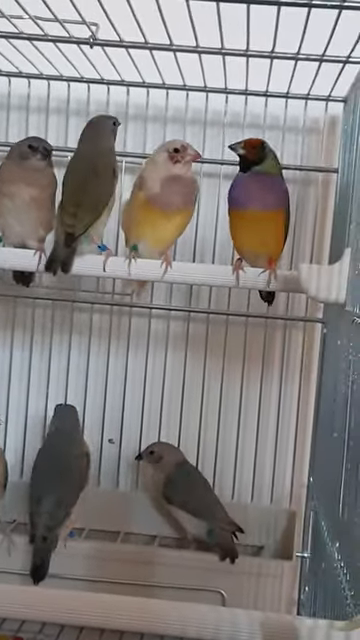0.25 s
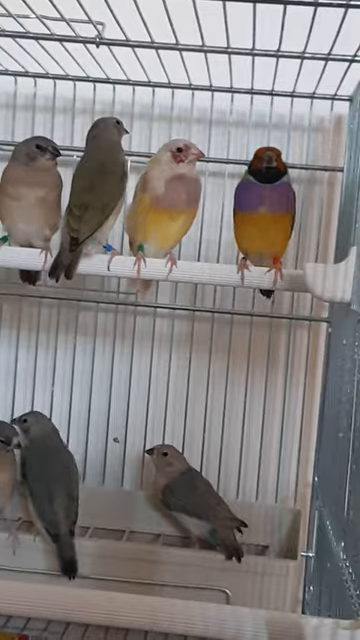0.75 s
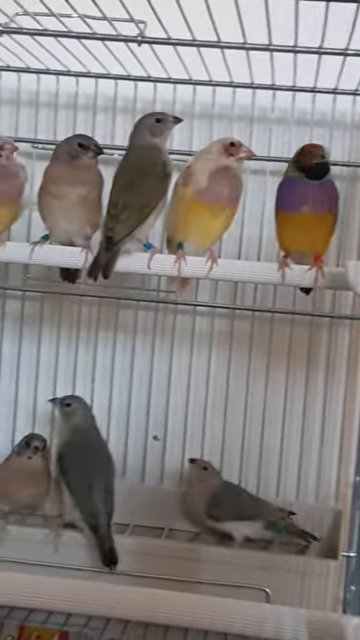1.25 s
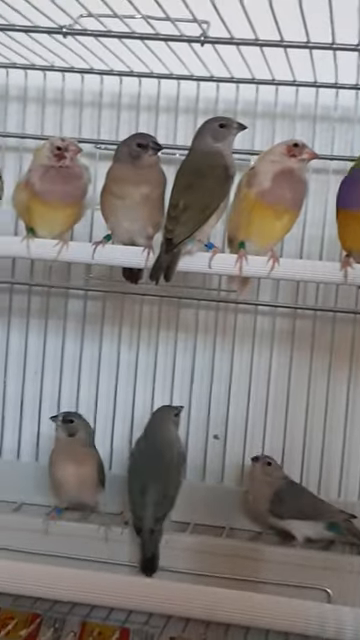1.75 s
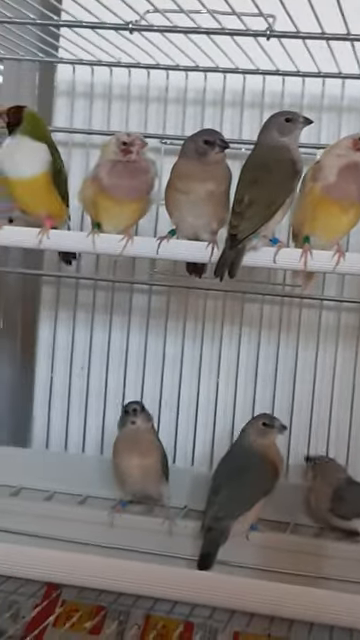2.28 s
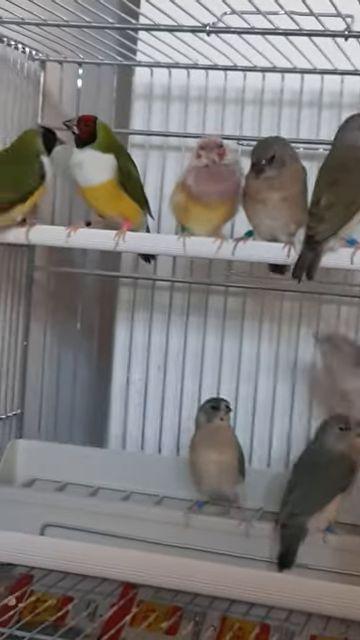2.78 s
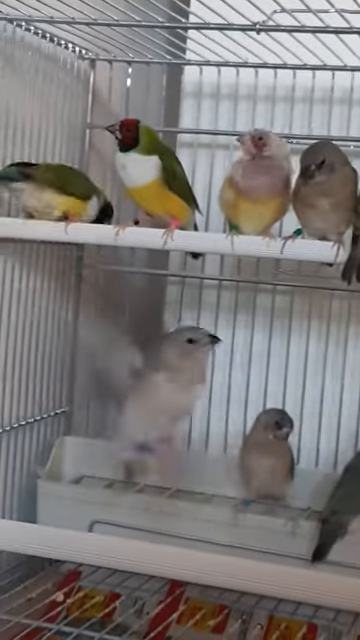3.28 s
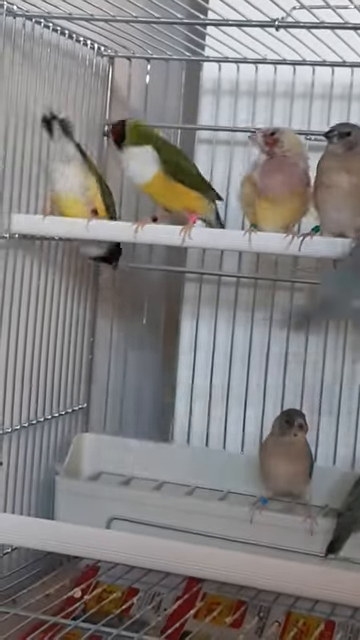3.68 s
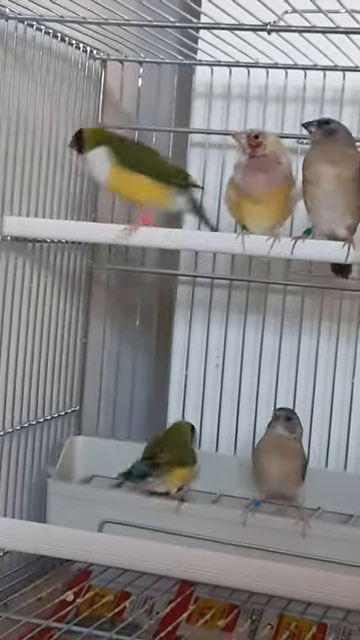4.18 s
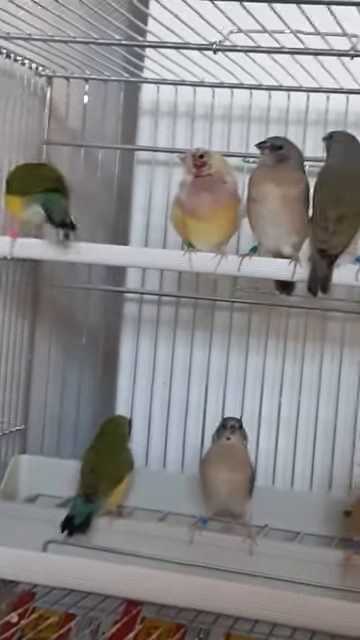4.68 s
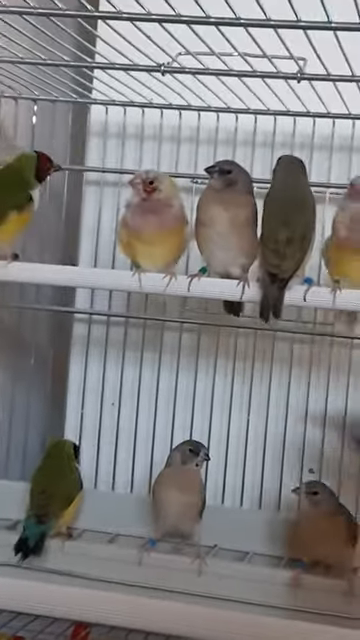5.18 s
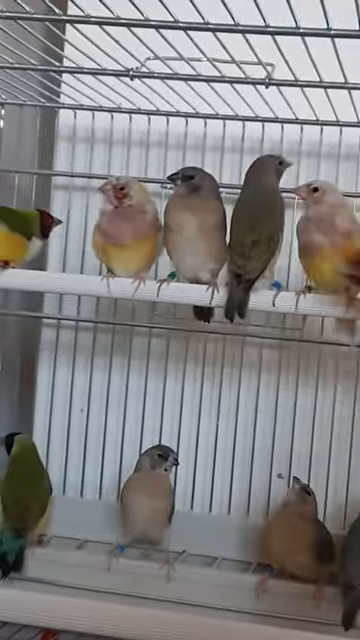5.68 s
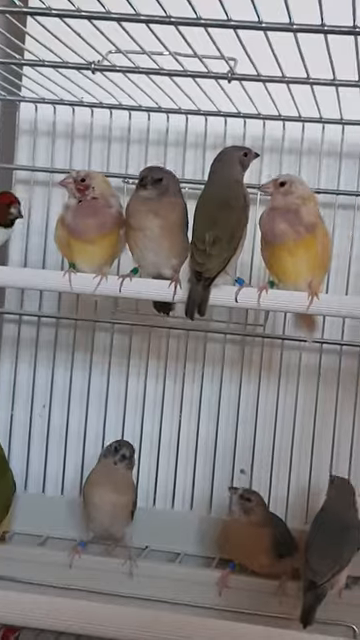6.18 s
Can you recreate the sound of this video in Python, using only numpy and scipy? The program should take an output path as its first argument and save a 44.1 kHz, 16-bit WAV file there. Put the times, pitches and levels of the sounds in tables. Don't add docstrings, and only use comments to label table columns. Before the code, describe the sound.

Close inside a quiet room, caged finches start with soft low wing puffs and faint far calls. A long thin whistle wavers near one second, then a male repeats rising whistles, rough churrs and sharp falling chirps. From about three seconds wings flap hard, buffeting the microphone, with claws ticking on wire and a loud perch knock at four. Loud high calls follow, then it thins to a last flutter.

```python
import sys
import numpy as np
from scipy import signal
from scipy.fft import rfft, irfft, next_fast_len
from scipy.io import wavfile
from scipy.ndimage import uniform_filter1d, map_coordinates

SR = 44100
rng = np.random.default_rng(int(sys.argv[2]) if len(sys.argv) > 2 else 0)


def dump(signal):
    limited = np.clip(np.atleast_2d(signal).T, -1, 1)
    pcm = np.round(limited * 32767).astype(np.int16)
    wavfile.write(sys.argv[1], SR, pcm)


def boost_factor(decibels):
    exponent = np.asarray(decibels, float) / 20
    return 10 ** exponent


N = 284004
TIME = np.arange(N) / SR


def unit(x):
    return x / np.sqrt(np.mean(np.abs(x) ** 2) + 1e-20)


def along(points, hz):
    f, v = np.transpose(points)
    return np.interp(np.log(hz + 1), np.log(f + 1), v)


def wobble(rate, size=N):
    place = np.arange(size) * abs(rate) / SR
    points = rng.standard_normal(int(size * abs(rate) / SR) + 4)
    return map_coordinates(points, [place], order=1)


def rush(spectrum, excite):
    # pitch in Hz, likeness from 0 to 1.
    alike = [(60, .68), (290, .62), (640, .34), (1400, .08), (6000, .02)]
    m = next_fast_len(N + 8192)
    hz = np.fft.rfftfreq(m, 1 / SR)
    spread = np.arccos(np.clip(along(alike, hz), -1, 1)) / 2
    noise = rfft(excite * rng.standard_normal((2, N)), m)
    pair = noise * boost_factor(along(spectrum, hz)) * [np.cos(spread), np.sin(spread)]
    mid, side = irfft(pair, m)[:, :N]
    return unit(np.array([mid + side, mid - side]))


def add(out, start_s, sound, pan_db, room_db, lag=4, size=140):
    # pitch in Hz, time to fall by 60 dB in seconds.
    room = [(500, 0.12), (3500, 0.56), (6000, 0.36), (12000, 0.41)]
    hz, t = np.fft.rfftfreq(256, 1 / SR), np.arange(size) * 128 / SR
    z = rng.standard_normal((2, len(hz), 2 * len(t))).view(complex)
    fade = boost_factor(-60 * t / along(room, hz)[:, None])
    tail = signal.istft(z * fade, SR, nperseg=256)[1]
    tail = boost_factor(room_db) * tail / np.linalg.norm(tail[0])
    answer = np.pad(tail, ((0, 0), (330, 0)))
    answer[0, 0] += boost_factor(pan_db / 2)
    answer[1, lag] += boost_factor(-pan_db / 2)
    for ch in (0, 1):
        answer[ch, rng.integers(20, 330, size=3)] += boost_factor(-16) * rng.standard_normal(3)
    heard = signal.fftconvolve(sound[None], answer, axes=1)
    part = out[:, max(round(start_s * SR), 0):][:, :heard.shape[1]]
    part += heard[:, :part.shape[1]]


def whistle(rows, hoarse, width_hz, overtone_db):
    s, hz, db = np.transpose(sorted(map(tuple, rows)))
    t = np.arange(s[0], s[-1], 1 / SR)
    pitch = np.interp(t, s, hz) * (1 + 0.002 * wobble(150, size=len(t)))
    phase = 2 * np.pi * np.cumsum(pitch) / SR
    overtones = [(1, 0), (2, overtone_db),
                 (3, min(1.4 * overtone_db - 8.0, -11)), (4, min(overtone_db + 2.0, -19))]
    tone = np.zeros(len(t), complex)
    for k, level_db in overtones:
        if k * min(hz) >= SR / 3:
            continue
        noisy = np.clip(hoarse * k, 0, 1)
        rate = 2 * np.sqrt(k) * width_hz
        breath = wobble(rate, size=len(t)) + 1j * wobble(rate, size=len(t))
        shake = np.sqrt(1 - noisy) + np.sqrt(noisy) * breath
        tone += boost_factor(level_db) * shake * np.exp(1j * k * phase)
    edge = np.clip(np.minimum(t - s[0], s[-1] - t) / 0.0014, 0, 1)
    return np.sqrt(2) * boost_factor(np.interp(t, s, db)) * edge * tone.real


def rising_whistles(out):
    # time from the accent in seconds, pitch in Hz, level in dB.
    rise = [(-.075, 3350, -40), (-.06, 3450, -22), (-.03, 3620, -19), (-.011, 3780, -15), (-.005, 4000, -6),
            (0, 4330, -1), (.004, 4560, 0), (.0075, 4700, -5), (.009, 4720, -30)]
    # time from the accent in seconds, pitch in Hz, level in dB.
    under = [(-.085, 1756, -52.5), (-.06, 1827, -9), (-.03, 1900, -5.5), (-.008, 2050, -8.5),
             (.002, 2010, -12)]
    # accent in seconds, level in dB, lead-in in dB, second voice in dB,
    # left-right balance in dB.
    rises = [
        (2.274, -42, 1, -15, 9),
        (2.44, -38.5, -6, -16.5, 8.5),
        (2.589, -38, -6.5, -16.5, 6),
        (3.508, -52, -5, -5.5, 5),
        (3.666, -44, 4, -12, 1.5),
        (3.859, -36.5, -7, -18, 9),
        (4.569, -33.5, -20.5, -19.5, 5.5),
        (4.716, -28, 8.5, -26, 4.5),
    ]
    for s, db, lead_db, under_db, pan_db in rises:
        rows = [(t, hz, level + lead_db * (hz < 4000)) for t, hz, level in rise]
        add(out, s + rise[0][0], boost_factor(db) * whistle(rows, .14, 300, -36), pan_db, -4)
        second = whistle(under, 1.0, 250.4, 0.89)
        add(out, s + under[0][0], boost_factor(db + under_db) * second, -2.5, -3)


def falling_chirps(out):
    # time from the accent in seconds, pitch in Hz, level in dB.
    fall = [(-.001, 4600, -25), (.001, 4620, -2), (.006, 4580, 0), (.0072, 4200, -16), (.0085, 3550, -8),
            (.024, 2950, -6), (.031, 2620, -23), (.044, 1860, -14), (.054, 1750, -24)]
    # accent in seconds, level in dB, glide in dB, left-right balance in dB.
    falls = [
        (2.933, -31, -4.5, 2),
        (4.19, -28.5, -5.5, 0),
        (5.238, -36, 4.5, 2.5),
    ]
    accent, glide = fall[:4], fall[3:]
    for s, db, glide_db, pan_db in falls:
        add(out, s + accent[0][0], boost_factor(db) * whistle(accent, 0.14, 400, -42), pan_db, -7)
        glide_sound = boost_factor(db + glide_db) * whistle(glide, 0.2, 300, -16)
        add(out, s + glide[0][0], glide_sound, pan_db + 10, -7)


def throat_buzzes(out):
    # start and end in seconds, first and last pitch in Hz, level in dB.
    buzzes = [
        (2.979, 3.026, 371.6, 389.8, -46),
        (4.237, 4.286, 377.7, 377, -45.5),
        (5.281, 5.338, 386, 380.3, -45.5),
    ]
    # pitch in Hz, level in dB.
    throat = [(400, -85), (750, -4.5), (1200, -3.5), (2000, -1.5), (2600, 7), (3200, 0), (4500, -6.5),
              (6000, -77)]
    # start and end in seconds, first and last pitch in Hz, level in dB.
    churrs = [
        (2.696, 2.764, 345, 415, -54),
        (3.954, 4.03, 350, 413, -54),
    ]
    # pitch in Hz, level in dB.
    churr_throat = [(400, -60), (800, -5), (1500, -7), (2050, 4), (2500, -5), (3800, -9), (4520, 3),
                    (5300, -40)]
    # start and end in seconds, first and last pitch in Hz, level in dB.
    grumbles = [
        (4.811, 4.959, 209.6, 237.5, -51),
    ]
    # pitch in Hz, level in dB.
    grumble_throat = [(700, -46), (1100, -4), (1500, 0), (1900, -3.5), (2600, -11.5), (3200, -4),
                      (4500, -1.5), (6000, -60)]
    for rows, colour in (buzzes, throat), (churrs, churr_throat), (grumbles, grumble_throat):
        for t0, t1, hz0, hz1, db in rows:
            u = np.linspace(0, 1, round((t1 - t0) * SR))
            pitch = (hz0 + (hz1 - hz0) * np.sqrt(u)) * (1 + .022 * wobble(200, size=len(u)))
            phase = 2 * np.pi * np.cumsum(pitch) / SR
            stack = np.zeros(len(u))
            for k in range(2, 22):
                stack += boost_factor(along(colour, k * hz1) + rng.normal(0, 1.5)) * np.sin(k * phase)
            swell = np.sin(np.pi * u) ** .8 * (1 + .3 * wobble(500, size=len(u)))
            add(out, t0, boost_factor(db) * unit(stack) * swell, 2.5, -4)


def song():
    out = np.zeros((2, N))
    rising_whistles(out)
    falling_chirps(out)
    throat_buzzes(out)
    return out


def note(length, hz0, hz1, db, shape):
    place, lead_db, fade_db, arch = shape
    silent_db = 15
    opened, closing = min(0.0034, length / 4), length - min(0.0026, length / 4)
    loudest = opened + np.clip(place, .01, .99) * (closing - opened)
    turns = [0, opened, loudest, closing, length]
    drops_db = [lead_db + silent_db, lead_db, 0, fade_db, fade_db + silent_db]
    t = np.linspace(0, length, num=40)
    hz = (hz0 + (hz1 - hz0) * t / length) * (1 + arch * np.sin(np.pi * t / length))
    return np.c_[t, hz, db - np.interp(t, turns, drops_db)]


def long_whistles(out):
    # time in seconds, pitch in Hz, level in dB.
    arch = [(4.792, 1960, -62), (4.805, 1990, -53.5), (4.839, 2180, -48.5), (4.875, 2300, -49.5),
            (4.897, 2320, -59), (4.915, 2336, -52.5), (4.94, 2280, -48.5), (4.957, 2130, -58.5)]
    # time in seconds, pitch in Hz, level in dB.
    long = [(1.078, 5280, -60), (1.116, 5500, -49), (1.145, 5330, -50), (1.2, 4470, -59), (1.27, 4050, -50),
            (1.34, 3950, -51), (1.386, 3820, -55), (1.436, 5240, -50), (1.458, 5150, -66)]
    add(out, arch[0][0], whistle(arch, .08, 200, -20), -5, -8)
    hen = whistle(long, .12, 170, 0)
    hen = hen * boost_factor(3 * wobble(70, size=len(hen)))
    add(out, long[0][0], hen, 2.5, -3, lag=0)


def calls():
    # start in seconds, length in seconds, first pitch in Hz,
    # last pitch in Hz, level in dB.
    far = [
        (0, 0.015, 3590, 3530, -72),
        (.45, 0.055, 3820, 3540, -64),
        (.492, 0.061, 3570, 3440, -61),
        (2.178, 0.092, 3110, 2830, -69),
        (5.806, 0.076, 3750, 3500, -59),
    ]
    swells = [(1.062, 0.069, 3135, 3726, -46), (3.43, 0.063, 3385, 3486, -56),
              (3.74, 0.057, 3655, 3520, -49), (3.8, 0.036, 3620, 3730, -50),
              (3.94, 0.076, 4390, 4616, -46.5), (4.385, 0.048, 3000, 3106, -46.5),
              (2.245, 0.031, 2970, 3240, -58), (2.405, .045, 2970, 3190, -61),
              (2.555, 0.042, 2940, 3230, -61.5), (4.66, 0.048, 2920, 3134, -47),
              (4.515, 0.038, 3070, 3260, -46.5)]
    clear = [
        (4.456, 0.042, 3660, 3565, -37),
        (4.51, 0.043, 3580, 3630, -42.5),
        (6.338, 0.096, 3356, 3440, -58),
        (5.241, .011, 4450, 3550, -41),
    ]
    low = [
        (1.056, 0.082, 2035, 2130, -67.5),
        (2.848, 0.026, 1955, 1600, -59.5),
        (4.108, 0.026, 1910, 1350, -55),
        (5.084, 0.046, 2255, 2080, -51),
        (5.112, .055, 1895, 1604, -51.5),
        (5.084, 0.035, 4540, 4510, -45.5),
    ]
    rasps = [
        (2.792, 0.016, 6700, 4650, -43),
        (4.047, 0.014, 6700, 4700, -38.5),
        (5.037, .009, 4650, 3500, -51),
    ]
    hisses = [(0, 0.046, 6070, 5880, -63), (.452, 0.13, 4440, 4540, -65), (.84, 0.17, 1780, 1394, -72.5),
              (1.056, 0.074, 4190, 4560, -51), (1.056, .07, 5980, 6000, -60.5),
              (2.06, .05, 4600, 4750, -67), (2.176, .02, 5700, 5700, -66), (5.76, 0.154, 4450, 4560, -67),
              (4.385, 0.046, 4500, 4660, -58.5), (4.82, .13, 5070, 5260, -56),
              (6.3, 0.096, 4450, 4560, -62.5), (6.345, 0.11, 4200, 4410, -60),
              (6.345, 0.11, 6500, 6560, -62.5)]
    bright = [
        (3.235, 0.14, 3240, 3697, -63.5),
        (4.72, 0.34, 3360, 3453, -65.5),
        (2.705, 0.046, 11800, 11630, -63.5),
        (2.71, .04, 13000, 13050, -66),
        (3.256, 0.019, 9700, 10150, -57),
        (4.047, 0.0077, 12600, 12800, -50),
    ]
    growing = [
        (4.372, 0.061, 3442, 3685, -26.5),
        (4.53, 0.049, 4020, 4330, -35),
    ]
    rounded = [
        (2.035, .078, 3380, 3600, -53.5),
        (2.04, 0.069, 1800, 1880, -59.5),
        (2.065, .048, 2700, 3000, -62.5),
    ]
    steps = [
        (2.803, .014, 4700, 4450, -46),
        (4.057, .012, 4680, 4550, -40),
        (2.815, .035, 3150, 3000, -55),
        (2.842, .05, 3650, 3600, -57),
        (4.068, 0.04, 3210, 3000, -51),
        (5.048, .02, 3050, 3000, -60),
    ]
    trails = [
        (4.735, 0.083, 4090, 3835, -43),
        (4.8, .12, 3850, 3590, -48),
        (5.262, 0.04, 3800, 3780, -47),
    ]
    # hoarseness 0-1, hoarse width Hz, overtone dB, left-right dB, room dB
    far_voice, clear_voice = (.35, 600, -30, .6, 4), (.05, 500, -45, .6, -10)
    swell_voice, round_voice = (.3, 500, -30, 2, -7), (.35, 400, -30, 2, -6)
    low_voice, rasp_voice = (.4, 240, -27, 1, -8), (.45, 500, -16, 3, -10)
    hiss_voice, bright_voice = (1.0, 1100, -40, 4, -2), (.3, 600, 3, 1.6, 1)
    trail_voice = (.7, 220, -45, .6, -6)
    # place of the loudest moment 0-1, start under it dB, end under it dB, pitch arch (share of pitch)
    far_shape, swell_shape = (0.21, 0.34, 12, 0.0118), (0.33, 7.7, 0.35, 0.0062)
    clear_shape, low_shape = (0.3, 1.5, 2.2, 0.0059), (0.27, 3, 2.5, .01)
    rasp_shape, round_shape = (.8, 6, 1, -.04), (0.67, 12, 2.8, 0.0046)
    growing_shape = (0.98, 21, 1.3, 0.0099)
    kinds = [(far, far_voice, far_shape), (swells, swell_voice, swell_shape),
             (clear, clear_voice, clear_shape), (low, low_voice, low_shape),
             (rasps, rasp_voice, rasp_shape), (hisses, hiss_voice, far_shape),
             (bright, bright_voice, low_shape), (growing, clear_voice, growing_shape),
             (rounded, round_voice, round_shape), (steps, rasp_voice, low_shape),
             (trails, trail_voice, clear_shape)]
    out = np.zeros((2, N))
    long_whistles(out)
    for table, voice, shape in kinds:
        hoarse, width_hz, overtone_db, pan_db, room_db = voice
        for s, *call in table:
            sound = whistle(note(*call, shape), hoarse, width_hz, overtone_db)
            add(out, s, sound, pan_db, room_db)
    return out


def birds():
    # pitch in Hz, level in dB.
    bill = [(2150, 0), (2500, -8), (2900, 0), (4720, 0), (5000, -11), (10500, -6)]
    # pitch in Hz, level in dB.
    shadow = [(6800, 0), (8200, -8), (10000, 2), (11500, 3), (13500, 0)]
    # pitch in Hz, turn in radians.
    turn = [(3850, 0), (4250, 1.8)]
    hz = np.fft.rfftfreq(N, 1 / SR)
    port_turn = np.exp(1j * np.outer([0, 1], along(turn, hz)))
    singer = rfft(song()) * boost_factor(along(bill, hz)) * port_turn
    callers = rfft(calls()) * boost_factor(along(shadow, hz))
    return irfft(singer + callers, N)


def bouts():
    # start in seconds, length in seconds, draught on the ports in dB,
    # feathers fanning in dB, feathers brushing the cage in dB.
    flights = [(0, 0.084, -56.5, -82.5, -86), (0.887, 0.025, -65, -76.5, -101),
               (1.016, 0.084, -58, -79, -76.5), (1.09, 0.41, -77, -87, -81.5),
               (1.315, 0.022, -57, -88, -100), (2.212, 0.0092, -55.5, -75, -81),
               (1.52, 0.11, -64.5, -107, -79), (1.743, 0.36, -60.5, -108, -77),
               (2.143, 0.33, -72.5, -89, -80), (2.528, 0.039, -53, -91, -72.5),
               (2.717, 0.15, -68.5, -70.5, -74), (2.935, 0.29, -49.5, -73, -73.5),
               (3.271, 0.072, -48, -67.5, -69), (3.326, 0.1, -67.5, -74, -87),
               (3.453, 0.093, -45, -65.5, -62.5), (3.614, 0.17, -46, -69, -64),
               (3.863, 0.21, -57.5, -69.5, -66), (4.002, 0.1, -68.5, -72.5, -58.5),
               (4.233, 0.49, -59, -77, -64), (4.66, 0.034, -79, -68, -83), (4.81, 0.18, -55.5, -75, -70.5),
               (4.877, 0.075, -76, -67, -86), (5.098, 0.033, -76, -68, -89), (5.098, 0.21, -62, -83, -67.5),
               (5.445, 0.24, -57.5, -84, -94), (5.736, 0.059, -67, -82.5, -125),
               (5.861, 0.089, -45, -67, -64), (6.405, .1, -63.5, -71.5, -88)]
    rest_db = (-65, -94, -87.5)
    take_off, settle = 342, 110
    t = TIME[::32]
    power = boost_factor(2 * np.array(rest_db))[:, None] * np.ones(len(t))
    for s, length, *db in flights:
        away_db = take_off * np.maximum(s - t, 0) + settle * np.maximum(t - s - length, 0)
        power = power + boost_factor(2 * np.array(db))[:, None] * boost_factor(-2 * away_db)
    return [np.interp(TIME, t, 10 * np.log10(p)) for p in power]


def wings():
    # pitch in Hz, level in dB per Hz.
    push_colour = [(13, -46), (30, -5.5), (62, 4), (124, -8), (170, -12), (260, -16), (340, -30),
                   (570, -120)]
    # pitch in Hz, level in dB per Hz.
    flap_colour = [(82, -51.5), (140, -6), (317, -9), (472, -17.5), (569, -16.5), (900, -35), (1170, -78.5),
                   (1980, -120)]
    # pitch in Hz, level in dB per Hz.
    feather_colour = [(3240, 3), (5500, 6.5), (6490, 3.5), (7430, -2), (8110, -12), (11200, 5.5),
                      (14000, 3), (15700, -11)]
    # pitch in Hz, level in dB per Hz.
    rustle_colour = [(350, -3.5), (887, 0.5), (1660, 0), (3010, -8), (3630, -6), (7000, -33), (9100, -42),
                     (15400, -120)]
    push_db, feather_db, rustle_db = bouts()
    flap_db = 1.42 * (push_db + 48.5) - 58.0
    beats = np.cumsum(23 * (1 + 0.2636 * wobble(12))) / SR
    stroke = np.cos(2 * np.pi * beats)
    crack = np.exp(-5 * (beats % 1))
    near = np.clip((flap_db + 76.5) / 12, 0, 1)
    beat = near * stroke
    push = rush(push_colour, boost_factor(2.5 * beat + 2.5 * wobble(14)))
    push = boost_factor(push_db + 4.0) * push * boost_factor([[1.4], [-1.4]])
    flap = rush(flap_colour, boost_factor(4.7 * beat + 1.8 * wobble(45)))
    flap = boost_factor(flap_db + 1.5) * flap * boost_factor([[-1.2], [1.2]])
    fan_db = 6 * near * (crack - .3) * np.abs(1 + wobble(12))
    flutter_db = 2 * wobble(7) + 3 * wobble(45) + 3 * wobble(400)
    feather = rush(feather_colour, boost_factor(fan_db + flutter_db))
    feather = boost_factor(feather_db + 9.5) * feather * boost_factor([[-.8], [.8]])
    rustle = boost_factor(rustle_db + 4.0) * rush(rustle_colour, boost_factor(1.4 * beat + 3.8 * wobble(30)))
    return push + flap + feather + rustle


def slaps():
    s, snap_db, swing_db, pan_db = 3.3125, -9, -14.5, -22
    late = np.maximum(TIME - s, 0)
    snap = -np.exp(-np.abs(TIME - s) / .00035)
    swing_turns = 72 * late + .22 * (1 - np.exp(-late / .004))
    swing = np.sin(2 * np.pi * swing_turns) * boost_factor(-60 * late / .095)
    return boost_factor([[pan_db], [0]]) * (boost_factor(snap_db) * snap + boost_factor(swing_db) * swing)


def cage():
    # time in seconds, level in dB, share of dull perch sound in dB.
    ticks = [(0.858, -54, 0), (0.883, -54, 0), (0.896, -57.5, -5), (0.9012, -57, 13), (0.939, -54, -13),
             (2.241, -60, 13.5), (2.277, -58, -12), (2.444, -55, -12), (2.935, -54, -12), (4.192, -52, -12),
             (2.3967, -65.5, -7), (2.567, -56.5, 8.5), (2.704, -62.5, -12.5), (2.7545, -57, -3),
             (2.7945, -57.5, -9), (2.9482, -53.5, -15), (3.3657, -49, -9), (3.515, -50, -8),
             (3.597, -52, -8), (4.203, -55, -12), (3.0033, -52, -9), (3.0941, -55.5, -9.5),
             (3.1415, -62, -9), (3.1886, -55, -6), (3.234, -52, -7), (3.4712, -47.5, -8.5),
             (3.4987, -44, 2.5), (3.6478, -54.5, -9), (3.6757, -52, -5), (3.781, -41.5, -4),
             (3.784, -45.5, -3), (3.882, -50, -5.5), (3.9556, -60.5, -12), (3.9801, -48.5, -0.5),
             (4.004, -41.5, -3), (4.026, -54, -10), (4.7189, -44, -11), (5.0965, -42, -13),
             (5.104, -41.5, -10), (5.2357, -60, -6), (5.7231, -62, -5), (5.8852, -58, -5),
             (5.9525, -47, -2), (6.0074, -46.5, -15), (6.3991, -59, -7)]
    # time in seconds, level in dB, left-right balance in dB.
    knocks = [
        (.905, -48, -1),
        (4.0055, -26.5, -2.5),
        (4.018, -38, -3),
        (2.753, -49, 0),
        (5.238, -46, 2),
        (5.863, -52.5, 3),
        (2.268, -58, 0),
        (2.435, -58, 0),
        (2.575, -57, 0),
    ]
    # pitch in Hz, level in dB, time to fall by 60 dB in seconds.
    perch = [(850, -5, .03), (1100, 0, .032), (1380, -3, .045), (1800, -3, .02), (2050, -13, .04)]
    out, t = np.zeros((2, N)), np.arange(SR // 8) / SR
    for s, db, perch_db in ticks:
        scratch = rng.standard_normal(len(t)) * boost_factor(-60 * t / 0.028)
        dull = unit(np.diff(uniform_filter1d(scratch, 12), prepend=0)) * np.std(scratch)
        sharp = scratch - uniform_filter1d(scratch, size=8)
        add(out, s, boost_factor(db - 6.0) * (sharp + boost_factor(perch_db - 7) * dull), 0, -6, lag=1, size=70)
    for s, db, pan_db in knocks:
        ring = np.zeros(len(t))
        for hz, level_db, t60 in perch:
            ring += boost_factor(level_db + rng.normal(0, 1.5) - 60 * t / t60) * np.sin(2 * np.pi * hz * t)
        thud = unit(uniform_filter1d(rng.standard_normal(len(t)), size=9))
        ring += .8 * thud * boost_factor(-60 * t / .012)
        ring *= 1 + 0.3 * wobble(660, size=len(t))
        add(out, s, boost_factor(db - 3) * ring * (1 - np.exp(-t / 0.001)), pan_db, -10, lag=1, size=70)
    return out


def drone():
    # time in seconds, level in dB.
    loudness = [(0, -70), (4.75, -63.5), (4.9, -51), (5.05, -49), (5.12, -64.5), (6.44, -65)]
    # pitch in Hz, level in dB per Hz.
    colour = [(100, -60), (124, -14), (134, 0), (146, -14), (180, -60)]
    return boost_factor(np.interp(TIME, *np.transpose(loudness))) * rush(colour, 1)


def whine():
    # start in seconds, end in seconds, level in dB.
    whines = [
        (2.232, 2.66, -79),
        (5.013, 5.457, -78.5),
        (6.002, 6.44, -78.5),
    ]
    on = np.zeros(N)
    for a, b, db in whines:
        on += boost_factor(db) * np.clip(np.minimum(TIME - a, b - TIME) / 0.035, 0, 1)
    phase = 2 * np.pi * np.cumsum(493 * (1 + .012 * wobble(30))) / SR
    return np.sqrt(2) * on * boost_factor(3.8 * wobble(20)) * np.sin(phase + np.array([[0], [-.3]]))


def hum():
    phase = 2 * np.pi * np.cumsum(46 * (1 + 0.059 * wobble(8.6))) / SR
    return np.sqrt(2) * boost_factor(-61 + 1.0 * wobble(5.4)) * np.sin(phase + np.array([[0], [.6]]))


def hush():
    # pitch in Hz, level in dB per Hz.
    hush_colour = [(120, -13.5), (230, -4.5), (339, -10), (516, -13.5), (1820, -28.5), (4600, -29.5),
                   (8090, -39), (15600, -22.5)]
    return boost_factor(-73) * rush(hush_colour, 1)


def scene():
    return birds() + wings() + slaps() + cage() + drone() + whine() + hum() + hush()


def low_pass(x):
    return signal.sosfilt(signal.butter(12, 15750, fs=SR, output="sos"), x)


def record(dry):
    lowest_hz, highest_hz = 38, 15750
    low_cut = signal.butter(5, lowest_hz, "high", fs=SR, output="sos")
    hz = np.fft.rfftfreq(N, 1 / SR)
    spectrum = rfft(signal.sosfilt(low_cut, dry))
    mix = irfft(spectrum * (hz < highest_hz), N)
    return low_pass(mix)


dry = scene()
out = record(dry)
dump(out)
```